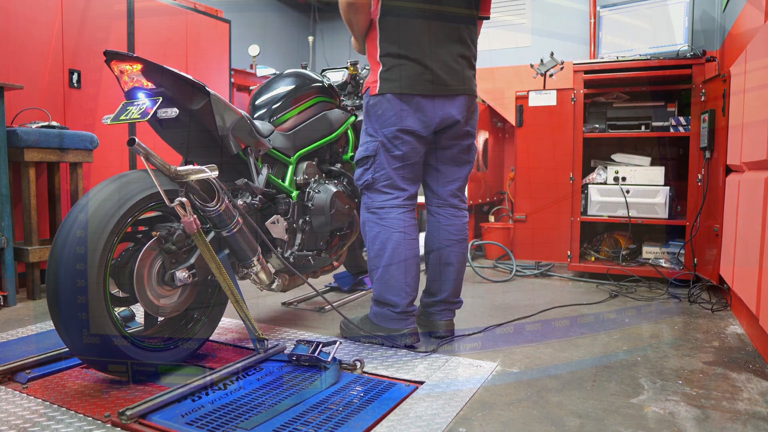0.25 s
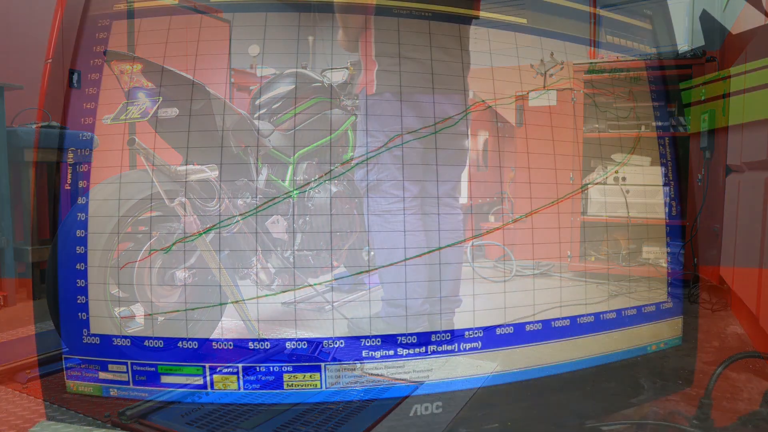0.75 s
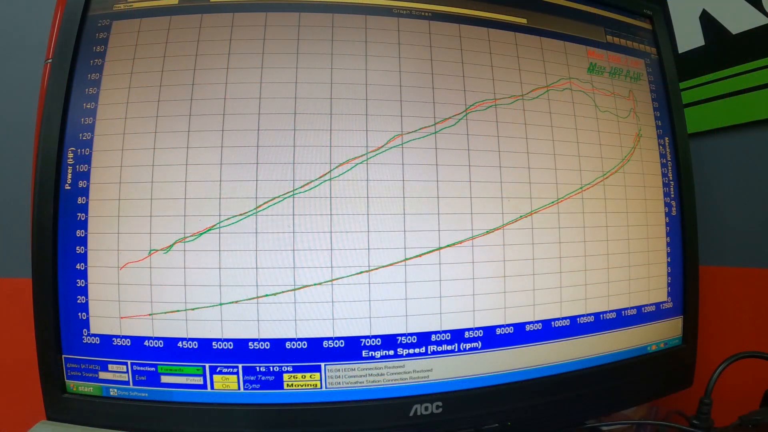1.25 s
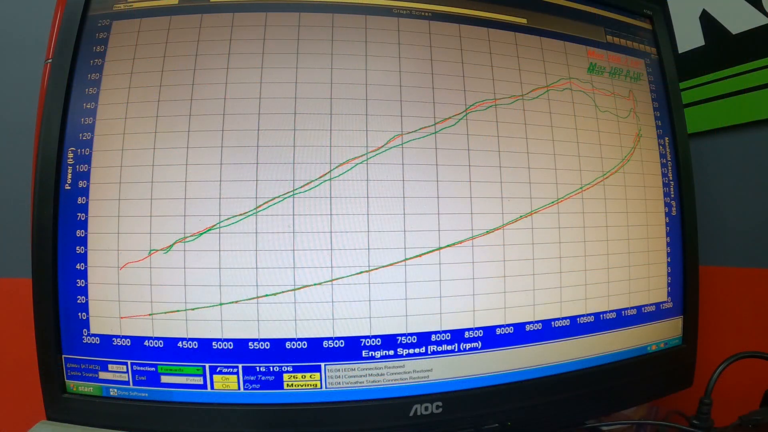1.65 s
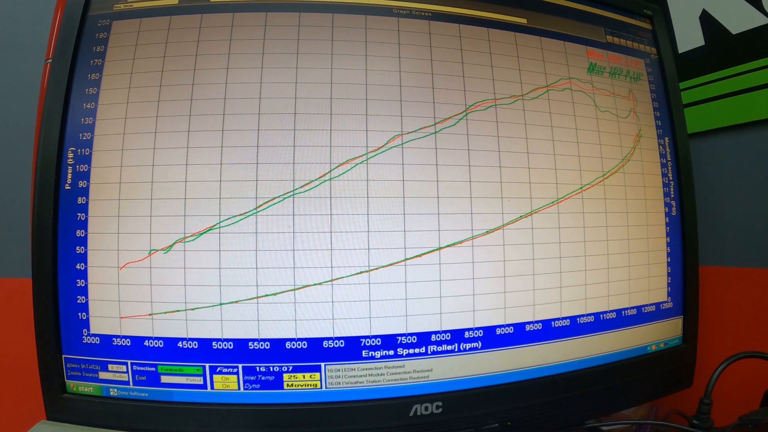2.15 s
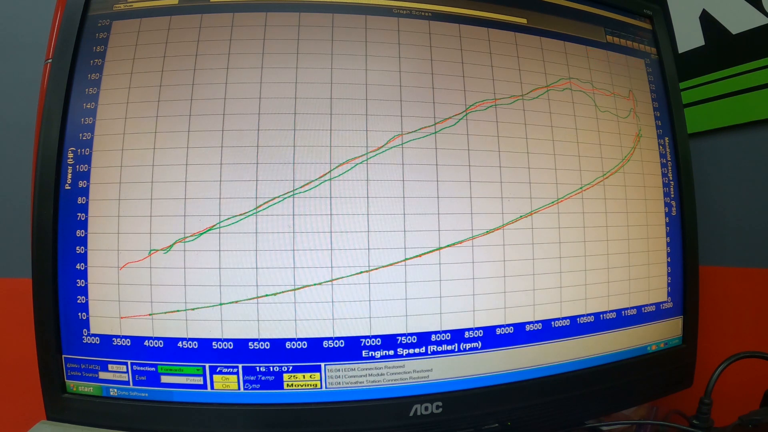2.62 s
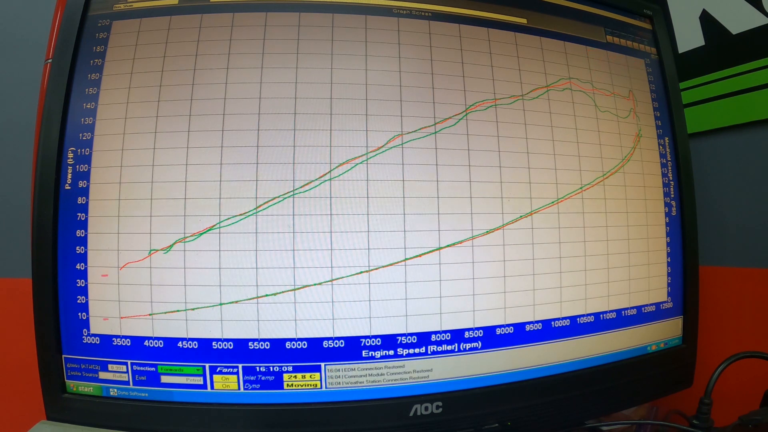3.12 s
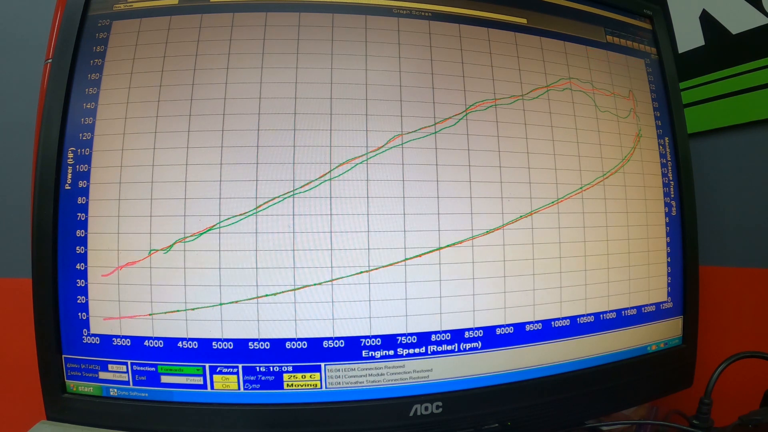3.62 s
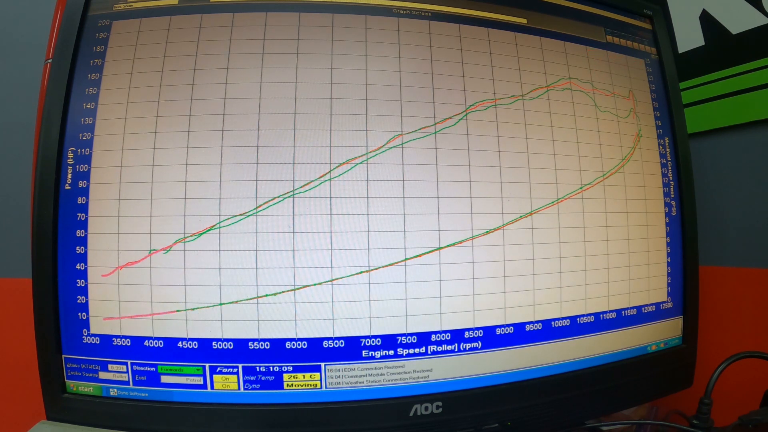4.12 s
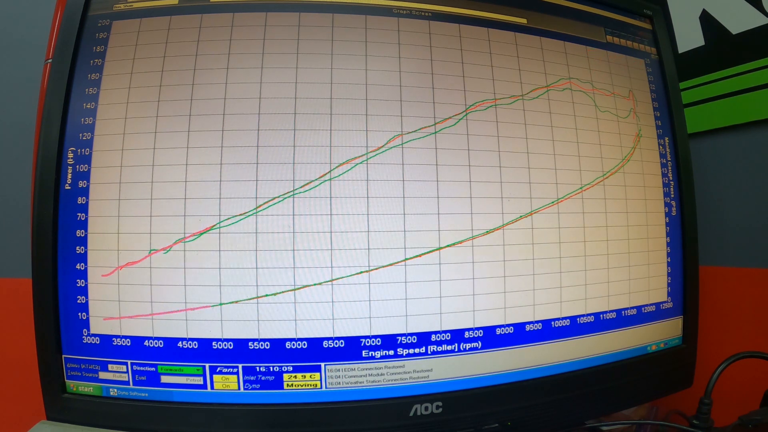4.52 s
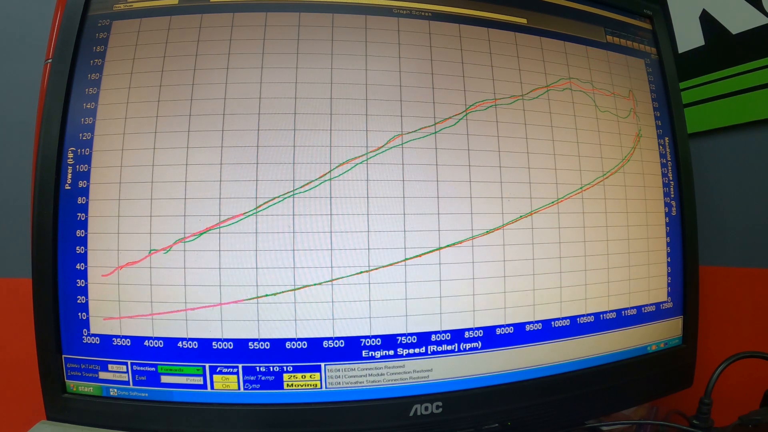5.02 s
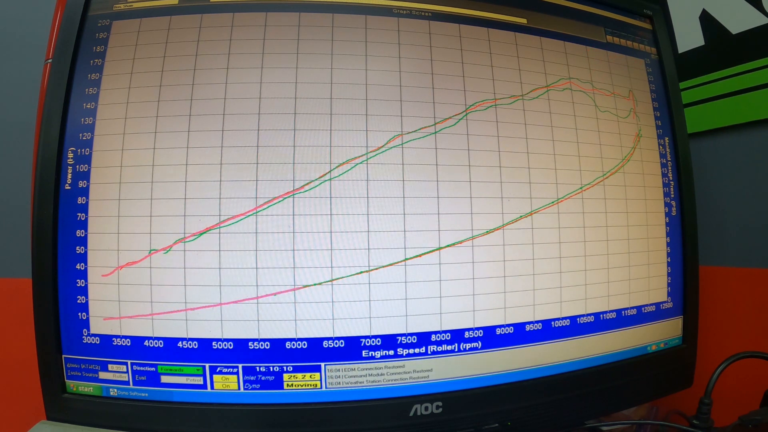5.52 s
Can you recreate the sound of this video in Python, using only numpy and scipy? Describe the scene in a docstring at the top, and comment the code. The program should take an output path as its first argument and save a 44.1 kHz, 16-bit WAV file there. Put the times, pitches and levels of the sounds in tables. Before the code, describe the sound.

In a small workshop, a motorcycle on rollers winds down, lugs briefly, then accelerates hard with a rising, raspy exhaust note.

```python
"""A four-cylinder motorcycle on a rolling-road dyno in a small workshop.
First it coasts down, throttle shut: sinking hum, tyre and chain hiss, thin whistle.
By 1.1 s this dissolves into a run in gear. Unequal firing makes it lug; then it steadies.
From about 3 s it pulls up at full throttle: exhaust orders sweep through the room's resonances,
over gas rasp, valve-train hiss and brief gear whines. A gain control turns the run's loud parts down."""
import sys
import numpy as np
from scipy import signal
from scipy.fft import rfft, irfft
from scipy.io import wavfile
from scipy.ndimage import uniform_filter1d, minimum_filter1d

SR = 44100
rng = np.random.default_rng(int(sys.argv[2]) if len(sys.argv) > 2 else 0)


def transcribe(signal):
    """Save signal, clipped to [-1, 1], as a 16-bit WAV file at the path in sys.argv[1]."""
    frames = np.atleast_2d(signal).T
    limited = np.clip(frames, -1, 1)
    pcm = np.round(limited * 32767).astype(np.int16)
    wavfile.write(sys.argv[1], SR, pcm)


N = 254456
TIME_S = np.arange(N) / SR
BINS_HZ = np.fft.rfftfreq(N, 1 / SR)

# coasting hum: (time [s], order 2 [dB], order 4 [dB], overtones and whines [dB])
HUM_LEVELS = [(0, -28, -44, -32.5), (.12, -35.5, -31, -30.5), (.24, -28.7, -26, -31),
              (.36, -26, -25.3, -37.5), (.6, -28.5, -28, -39)]
# its overtones, with engine-locked whines at orders 13, 19, 26 and 29: (firing order, relative level [dB])
HUM_LINES = [(2.5, -14.5), (3, -15.5), (3.5, -18), (5, -16), (6, -4), (7, -14), (8, -11), (10, -10),
             (12, -8), (13, -14), (14, -15), (18, -15), (19, -14), (26, -19), (29, -19)]
# noise spectra: (frequency [Hz], relative level [dB])
TYRE_CHAIN_SPECTRUM = [(20, -19), (100, -7), (250, -4), (500, -3.5), (900, -1.5), (1500, -3), (2500, -5),
                       (4000, -8.5), (7000, -16), (10000, -19), (13000, -22.5), (15500, -29)]
RUMBLE_SPECTRUM = [(15, -30.5), (35, -17), (65, -10.5), (120, -9.5), (170, -5.5), (230, -0.5), (310, 0.5),
                   (380, -4), (470, -5.5), (600, -17.5), (1200, -52.5), (4000, -100)]
THUD_SPECTRUM = [(15, -18.5), (35, -7.5), (58, 2.5), (90, -2), (140, -13.5), (300, -42), (2000, -110)]
RASP_SPECTRUM = [(250, -34), (450, -7.5), (600, -0.5), (720, -2), (850, 0.5), (1000, -1.5), (1250, -2),
                 (1700, -7.5), (2100, -15), (3000, -30), (6000, -60), (12000, -100)]
VALVE_SPECTRUM = [(800, -31), (1600, -2), (2100, -.5), (2600, -2), (3700, -4), (4300, -8), (5000, -13.5),
                  (6500, -18), (7200, -19), (8600, -22.5), (10500, -34), (12800, -33), (15500, -46)]
# left-right likeness of the hisses: (frequency [Hz], coherence [0-1])
TYRE_CHAIN_COHERENCE = [(150, 1), (300, .85), (640, .75), (1400, .7), (3100, 0.5), (7000, .2)]
VALVE_COHERENCE = [(9000, 1), (10500, 1), (12500, .6)]
# engine speed in gear: (time [s], firing rate [Hz])
FIRING_RATE = [(0.3, 81.95), (0.86, 82.64), (1.2, 83.59), (1.39, 87.41), (1.71, 101.76), (1.79, 103.74),
               (1.99, 101.97), (2.14, 105.96), (2.22, 105.73), (2.42, 98.89), (2.69, 101.87),
               (2.83, 102.42), (2.95, 104.65), (3.44, 116.86), (4.0, 138.94), (4.51, 159.0), (4.96, 177.96),
               (5.78, 211.9)]
# gear whines: (firing order, level re valve hiss [dB], peak time [s], 1/e half-width [s])
GEAR_WHINES = [(25.96, -4.5, 1.5, .32), (144, -28, 1.15, .22), (64, -34, 5.35, .15)]
# uneven firing and pulse-front snarl: (time [s], level [dB])
LOPE_LEVEL = [(0.3, -23.5), (1.15, -24), (1.45, -33), (1.9, -41), (2.7, -42), (3.27, -35), (4.15, -33),
              (4.9, -30), (5.77, -41)]
SNARL_LEVEL = [(1.1, -39), (1.65, -44), (2.15, -35.5), (2.5, -38.5), (2.9, -38), (3.2, -32.5), (3.9, -34),
               (4.3, -36), (4.7, -31.8), (5.15, -32.2), (5.77, -37)]
# their colouring by pipe and room: (frequency [Hz], relative level [dB])
LOPE_SPECTRUM = [(20, -38), (42, -17), (54, -4), (64, -4), (78, -12), (125, -17), (170, -9), (207, 3),
                 (260, -2), (295, -6.5), (380, -14), (450, -11), (600, -6), (800, -14), (1500, -20),
                 (2500, -32)]
SNARL_SPECTRUM = [(620, -1), (720, -4.5), (800, 4), (890, -3), (975, 3), (1040, -3), (1120, 3), (1180, 0),
                  (1250, 4), (1380, -5), (1510, 3), (1680, 0), (1800, 1), (1950, -5), (2400, -4),
                  (3700, -8), (6000, -28)]
# firing orders 1-8 ahead of silencer and room: (level at cruise [dB], slope with speed [dB/octave])
EXHAUST_ORDERS = [(16.3, -14.2), (0.2, -1.4), (-7.3, 7.1), (-9.3, 4.4), (-12.6, 5.6), (-13.5, 4.8),
                  (-18.7, 7.6), (-20.4, 7.6)]
# silencer response: (frequency [Hz], gain [dB])
SILENCER = [(80.0, -47.1), (105.0, -38.3), (150.0, -18.5), (165.0, -19.9), (205.0, -10.8), (275.0, -25.1),
            (350.0, -13.7), (440.0, -16.9), (600.0, -23.2), (800.0, -25.6), (1000.0, -29.9),
            (1250.0, -23.2), (1700.0, -29.7)]
# wall-echo cancellations and standing waves: (frequency [Hz], width [Hz], gain [dB])
WORKSHOP_NULLS = [(124.4, 21.7, -21.5), (145.7, 17.3, -8.8), (226.2, 21.4, -24.1), (308, 6, -13),
                  (333, 30.6, -22), (358.3, 23.1, -8.4), (414.0, 10.7, -10.2), (469.1, 11.3, -12.9),
                  (510.4, 32.7, -12.5), (550.2, 14.4, -22.2), (657.1, 8.8, -3.5), (709.1, 18.5, -15.6),
                  (746.1, 26.5, -10.7), (1409.5, 90.3, -13.2)]
WORKSHOP_MODES = [(237.6, 17.0, 8.6), (270.0, 23.7, 14.7), (292.0, 27.0, 14.9), (426.1, 6.9, 4.0),
                  (456.5, 12.7, 3.8), (530.3, 8.9, 5.5), (623.8, 27.7, 5.9), (684.5, 12.2, 5.1),
                  (811.7, 16.7, 10.8), (967.0, 25.1, 12.2), (1099.4, 51.0, 8.1), (1251.8, 26.1, 11.5),
                  (1504.0, 23.9, 11.5), (1591.2, 23.1, 6.6)]
# one strong wall echo: (frequency [Hz], strength [0-1])
WALL_ECHO = [(600, 0), (800, .45)]

CRUISE_HZ, SMOOTH_LOPE_DB = 100, -40
# (level at smooth cruise [dB], slope with speed [dB/octave], slope with lope [dB/dB])
RUMBLE_LAW, THUD_LAW = (-39.5, -.5, .52), (-46, -10, .55)
RASP_LAW, MECHANICAL_LAW = (-37.6, 5, .19), (-42.1, 2.4, .1)
SIDES = np.array([[1], [-1]])  # left, right


def gain_of(db):
    """Decibels to amplitude."""
    return 10 ** (np.asarray(db) / 20)


def unit_rms(x):
    """Scale to rms 1."""
    return x / np.sqrt(np.mean(x ** 2) + 1e-20)


def levelled(x, window_samples):
    """Hold the running rms at 1."""
    return x / np.sqrt(uniform_filter1d(x ** 2, size=window_samples) + 1e-9)


def lookup(table, hz):
    """Interpolate on a log-frequency axis."""
    knots_hz, values = np.transpose(table)
    return np.interp(np.log(hz + 1), np.log(knots_hz + 1), values)


def curves(table):
    """One per-sample curve for each value column."""
    times_s, *columns = np.transpose(table)
    return [np.interp(TIME_S, times_s, column) for column in columns]


def coloured(x, spectrum):
    """Filter by a spectrum table; rms 1."""
    return unit_rms(irfft(rfft(x) * gain_of(lookup(spectrum, BINS_HZ)), N))


def wander(hz):
    """Random drift up to about hz; rms 1."""
    return unit_rms(irfft(rfft(rng.standard_normal(N)) / (1 + (BINS_HZ / hz) ** 4), N))


def stereo_noise(coherence):
    """White noise, left and right alike by a table."""
    same = np.clip(lookup(coherence, BINS_HZ), 0, 1)
    mid, side = rfft(rng.standard_normal((2, N))) * np.sqrt([1 + same, 1 - same])
    return unit_rms(irfft(np.array([mid + side, mid - side]), N))


def order_tone(firings, order):
    """Sinusoid at a multiple of the firing rate; rms 1."""
    return np.sqrt(2) * np.cos(2 * np.pi * (order * firings + rng.random()))


def puffs(firings, depth):
    """Gain that swells once per firing."""
    return unit_rms(np.exp(depth * np.cos(2 * np.pi * firings)))


def workshop(x, wet_db, t60_s=.25):
    """Direct sound plus dense wall echoes."""
    t = np.arange(SR // 2) / SR
    tail = unit_rms(rng.standard_normal(len(t)) * gain_of(-60 * t / t60_s)) / np.sqrt(len(t))
    return x + gain_of(wet_db) * signal.oaconvolve(x, tail)[:N]


def tyre_chain_hiss(firings):
    """Broad hiss of tyre and chain, pulsing lightly."""
    return coloured(stereo_noise(TYRE_CHAIN_COHERENCE) * puffs(firings, depth=.15), TYRE_CHAIN_SPECTRUM)


def whistle(firings, order=144, start_db=-46.8, sag_db_per_s=3.5, blur_hz=230, lean_db=1.8, spread=.6):
    """Thin noise band, falling with engine speed."""
    carrier = np.exp(2j * np.pi * order * firings)
    mid, side = [(carrier * (wander(blur_hz) + 1j * wander(blur_hz))).real for _ in range(2)]
    level_db = start_db - sag_db_per_s * TIME_S + lean_db * SIDES
    return gain_of(level_db) * unit_rms(mid + spread * SIDES * side)


def coast_hum(firings, spread=.2):
    """Orders 2 and 4, plus overtones and whines whose wall echoes differ left and right."""
    second_db, fourth_db, overtones_db = curves(HUM_LEVELS)
    hum = gain_of(second_db) * order_tone(firings, 2) + gain_of(fourth_db) * order_tone(firings, 4)
    direct = sum(gain_of(db) * order_tone(firings, order) for order, db in HUM_LINES)
    overtones = direct + spread * SIDES * workshop(direct, wet_db=0)
    return hum + gain_of(overtones_db) * overtones


def coast(start_hz=85.7, sag_hz_per_s=18.6, jitter_firings=.0052, hiss_db=-32):
    """Throttle shut: the firing rate sinks steadily."""
    firings = np.cumsum(start_hz - sag_hz_per_s * TIME_S) / SR + jitter_firings * wander(25)
    return coast_hum(firings) + gain_of(hiss_db) * tyre_chain_hiss(firings) + whistle(firings)


def gear_whines(firings, backlash_firings=.0055):
    """Engine-locked whines, each swelling at a resonance; backlash blurs the high ones most."""
    whines = np.zeros(N)
    for order, db, peak_s, half_width_s in GEAR_WHINES:
        swell = np.exp(-((TIME_S - peak_s) / half_width_s) ** 2)
        whines += gain_of(db) * swell * order_tone(firings + backlash_firings * wander(60), order)
    return whines


def valve_hiss(firings):
    """Valve-train hiss, pulsing faintly."""
    return coloured(stereo_noise(VALVE_COHERENCE) * puffs(firings, depth=.083), VALVE_SPECTRUM)


def low_thud():
    """Dull noise around 60 Hz."""
    return coloured(rng.standard_normal(N), THUD_SPECTRUM)


def gas_turbulence(firings, spectrum):
    """Turbulent exhaust gas, one puff per firing."""
    return coloured(rng.standard_normal(N) * puffs(firings, depth=.25), spectrum)


def uneven_firing(firings, firing_hz, cycle_db=-11):
    """Unequal cylinders add odd multiples of the crank rate and, weaker, of the four-stroke cycle."""
    def tone(order):
        return gain_of(lookup(LOPE_SPECTRUM, order * firing_hz)) * order_tone(firings, order)

    crank = sum(tone(k / 2) for k in range(1, 13, 2))
    cycle = sum(tone(k / 4) for k in range(3, 33, 2))
    return levelled(crank + gain_of(cycle_db) * cycle, window_samples=8000)


def exhaust_snarl(firings, firing_hz, odd_db=-7, ripple_db=3.5, flutter=.35, slope_db_per_order=-.85):
    """Steep pulse fronts: high crank orders flutter with the burn and glide across dense room modes."""
    modes_hz = np.arange(0, 7000, 22)
    ripple = np.clip(rng.standard_normal(len(modes_hz)), -2, 2)
    room_db = ripple_db * ripple + lookup(SNARL_SPECTRUM, modes_hz)
    burn = wander(18)
    fronts = np.zeros(N)
    for crank_order in range(17, 51):
        level_db = np.interp(crank_order / 2 * firing_hz, modes_hz, room_db)
        level_db += odd_db * (crank_order % 2) + slope_db_per_order * crank_order
        tone = gain_of(level_db) * order_tone(firings, crank_order / 2)
        fronts += tone * (1 + flutter * np.roll(burn, rng.integers(N)))
    return levelled(workshop(unit_rms(fronts), wet_db=-7.5), window_samples=12000)


def exhaust_path_db(hz, comb_spacing_hz=50.1, ripple_db=1.6):
    """Silencer and room response: nulls, modes, one echo's comb, ripple from denser modes."""
    def peak(centre_hz, width_hz):
        return 1 / (1 + (2 * (hz - centre_hz) / width_hz) ** 2)

    nulls_db = sum(10 * np.log10(1 - (1 - gain_of(db) ** 2) * peak(centre_hz, width_hz))
                   for centre_hz, width_hz, db in WORKSHOP_NULLS)
    modes_db = sum(db * peak(centre_hz, width_hz) for centre_hz, width_hz, db in WORKSHOP_MODES)
    echo = np.clip(lookup(WALL_ECHO, hz), 0, .9) * np.exp(2j * np.pi * hz / comb_spacing_hz)
    comb_db = 20 * np.log10(abs(1 - echo))
    knots_hz = hz[::9]
    ripple = np.clip(rng.standard_normal(len(knots_hz)), -2, 2) * np.interp(knots_hz, [200, 600], [0, 1])
    room_db = nulls_db + modes_db + comb_db + ripple_db * np.interp(hz, knots_hz, ripple)
    return lookup(SILENCER, hz) + room_db


def exhaust_note(firings, firing_hz, shiver_depth=.045):
    """Eight low orders glide through one response; no two bangs are equal, so higher ones shiver more."""
    grid_hz = np.arange(2000)
    path_db = exhaust_path_db(grid_hz)
    octaves = np.log2(firing_hz / CRUISE_HZ)
    shiver = shiver_depth * wander(35)
    note = np.zeros(N)
    for order, (db, db_per_octave) in enumerate(EXHAUST_ORDERS, 1):
        level_db = db + db_per_octave * octaves + np.interp(order * firing_hz, grid_hz, path_db)
        note += gain_of(level_db) * order_tone(firings, order) * (1 + np.sqrt(order) * shiver)
    return note


def pull(jitter_firings=.002, surge_db=.5, surge_hz=12):
    """Engine under load: noise levels follow speed and lope; burn surges move the upper layers together."""
    firing_hz, lope_db = curves(FIRING_RATE)[0], curves(LOPE_LEVEL)[0]
    firings = np.cumsum(firing_hz) / SR + jitter_firings * wander(23)
    octaves = np.log2(firing_hz / CRUISE_HZ)

    def gain(law):
        db, db_per_octave, per_lope = law
        return gain_of(db + db_per_octave * octaves + per_lope * (lope_db - SMOOTH_LOPE_DB))

    note = exhaust_note(firings, firing_hz)
    snarl = gain_of(curves(SNARL_LEVEL)[0]) * exhaust_snarl(firings, firing_hz)
    lope = gain_of(lope_db) * uneven_firing(firings, firing_hz)
    rumble = gain(RUMBLE_LAW) * gas_turbulence(firings, RUMBLE_SPECTRUM)
    thud = gain(THUD_LAW) * low_thud()
    rasp = gain(RASP_LAW) * gas_turbulence(firings, RASP_SPECTRUM)
    hiss = valve_hiss(firings)
    surge = gain_of(surge_db * wander(surge_hz))
    mechanical = gain(MECHANICAL_LAW) * (hiss + gear_whines(firings))
    return note + lope + rumble + thud + surge * (snarl + rasp + mechanical)


def gain_control(x, knee_db=-15, squeeze=.8):
    """Turns loud passages down, so rasp and hiss rise when the strongest order falls into a null."""
    power = (x ** 2).mean(axis=0)
    smoothed = uniform_filter1d(uniform_filter1d(power, size=2200), size=2200)
    excess_db = np.maximum(10 * np.log10(abs(smoothed) + 1e-12) - knee_db, 0)
    return x * gain_of(-squeeze * excess_db)


def scene(fade_out_s=(.15, 1.14), fade_in_s=(.17, 1.1)):
    """The coast-down dissolves into the run in gear."""
    coasting = coast() * np.interp(TIME_S, fade_out_s, [1, 0])
    pulling = gain_control(pull()) * np.interp(TIME_S, fade_in_s, [0, 1])
    return coasting + pulling


def record(dry, ceiling=.477, cutoff_hz=15650):
    """Peak limiter, then low-pass."""
    allowed_gain = np.minimum(1, ceiling / (abs(dry).max(axis=0) + 1e-9))
    limited = dry * uniform_filter1d(minimum_filter1d(allowed_gain, size=1600), size=1500)
    lowpass = signal.firwin(1023, cutoff_hz, window=("kaiser", 9), fs=SR)
    return signal.oaconvolve(limited, lowpass[None], "same", axes=1)


dry = scene()
out = record(dry)
transcribe(out)
```